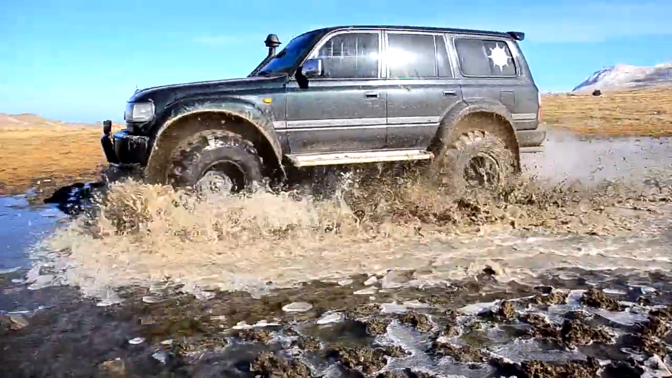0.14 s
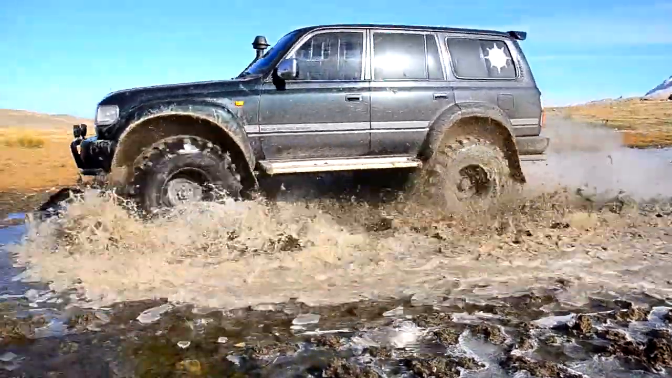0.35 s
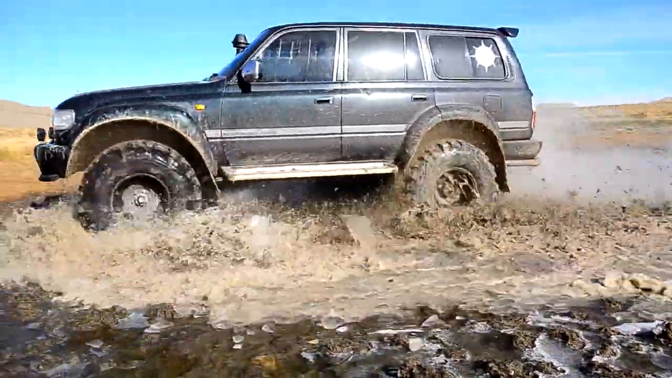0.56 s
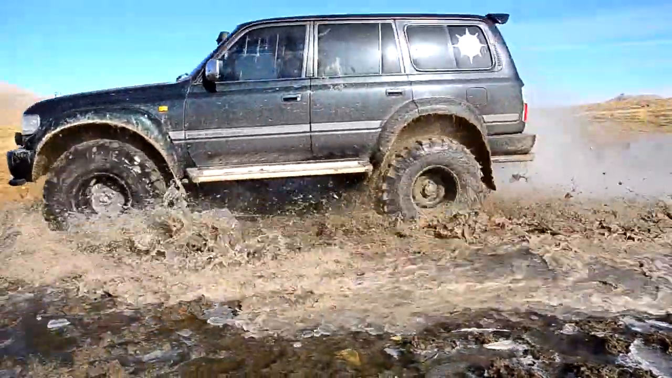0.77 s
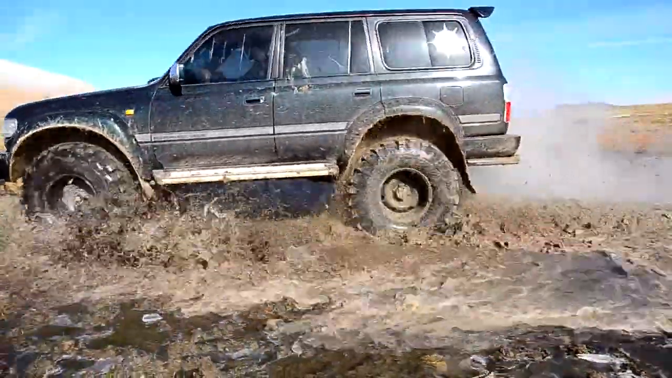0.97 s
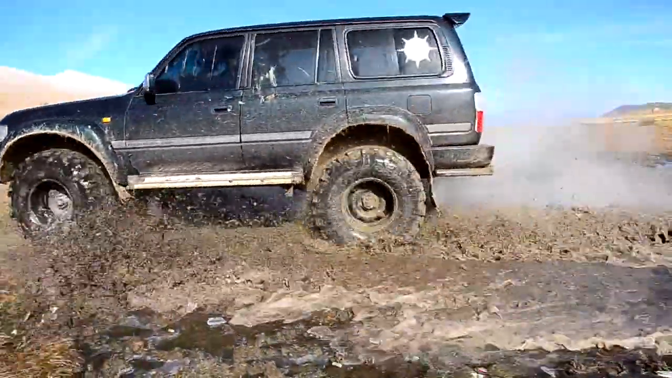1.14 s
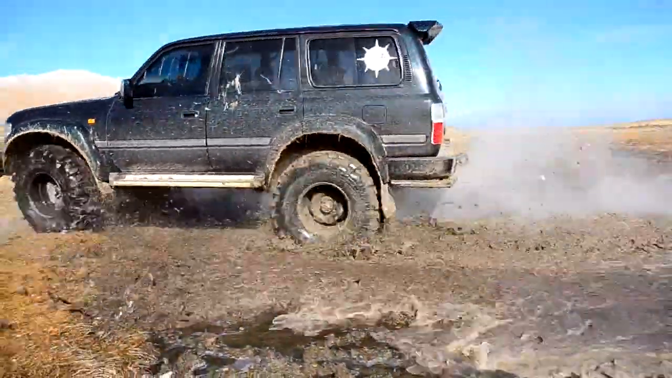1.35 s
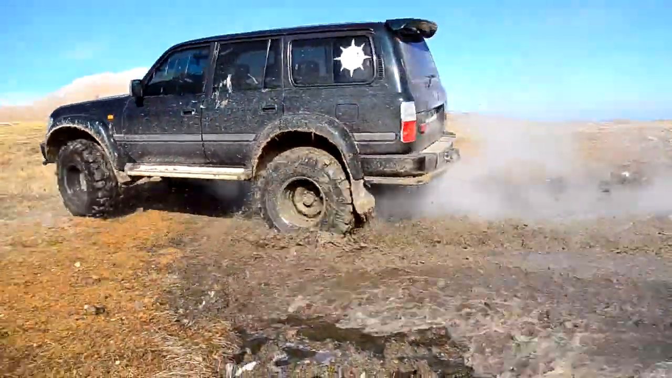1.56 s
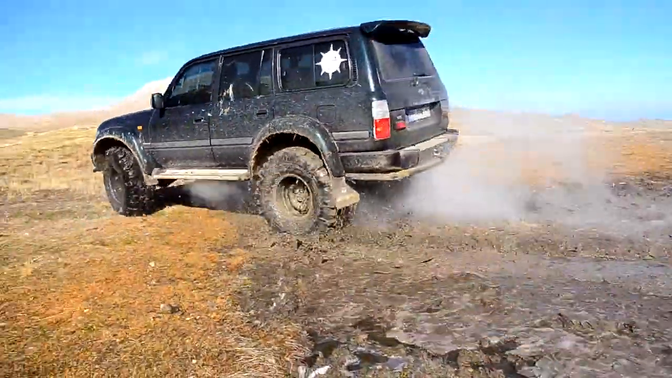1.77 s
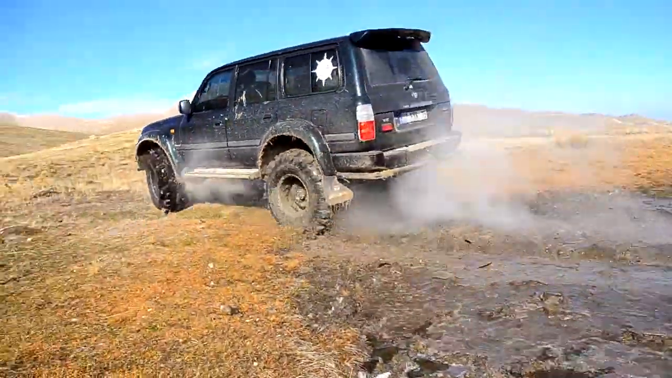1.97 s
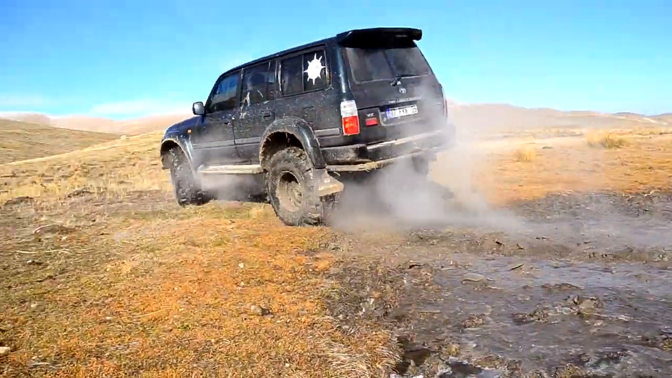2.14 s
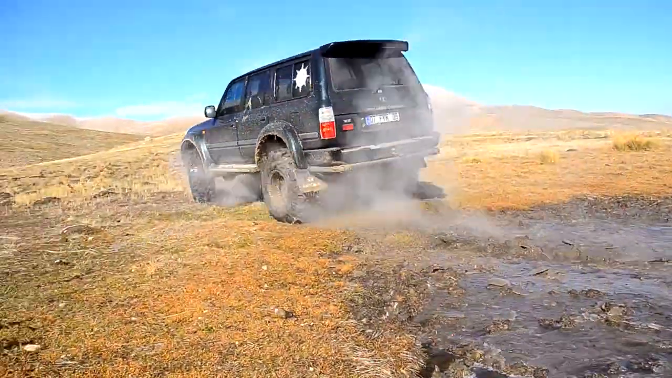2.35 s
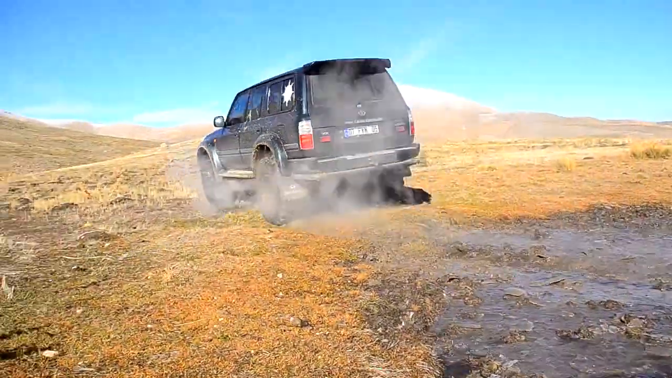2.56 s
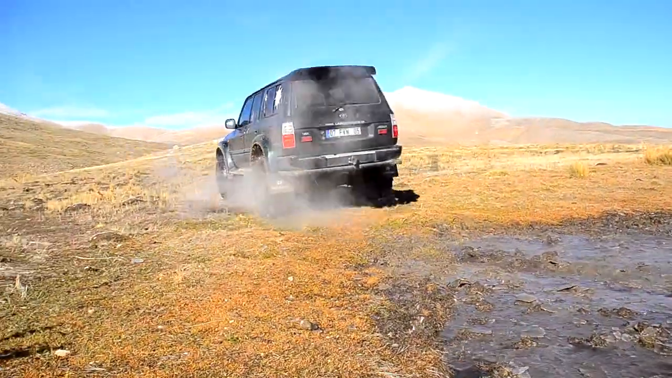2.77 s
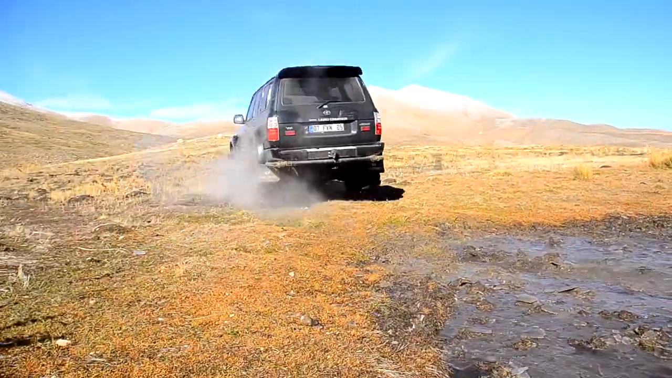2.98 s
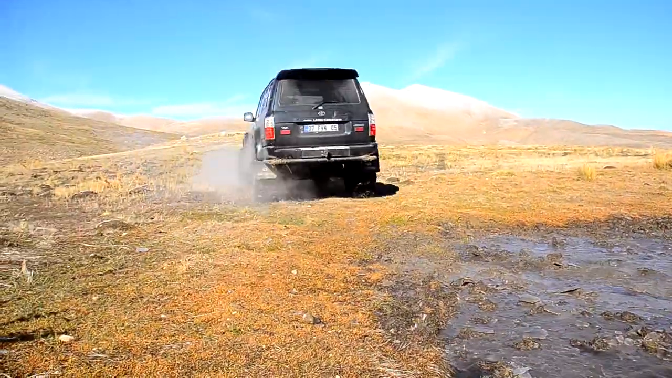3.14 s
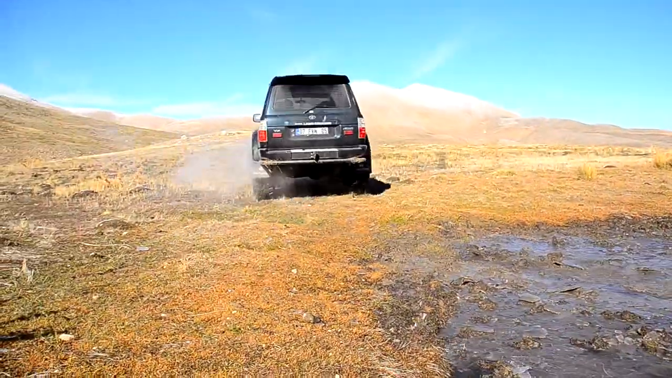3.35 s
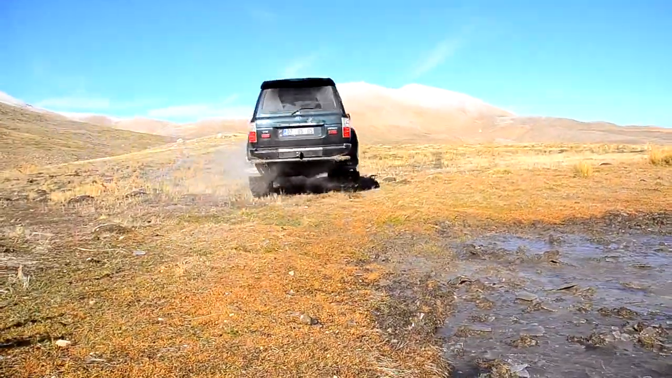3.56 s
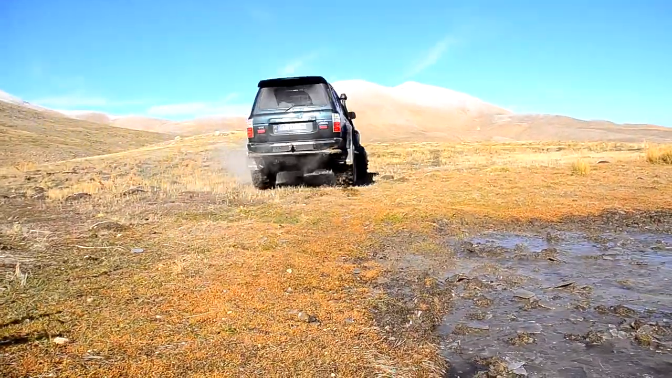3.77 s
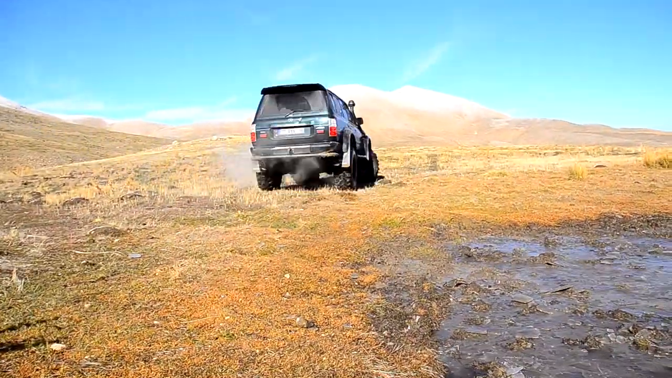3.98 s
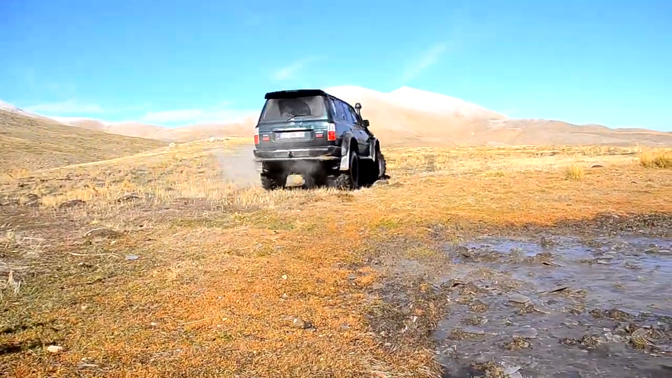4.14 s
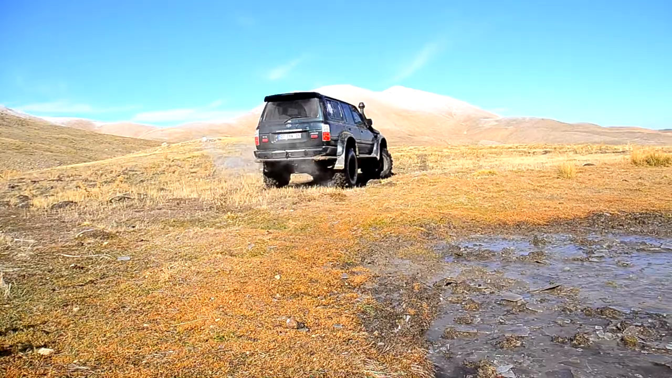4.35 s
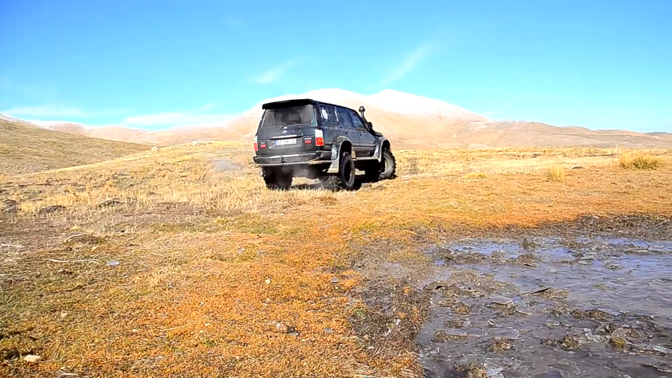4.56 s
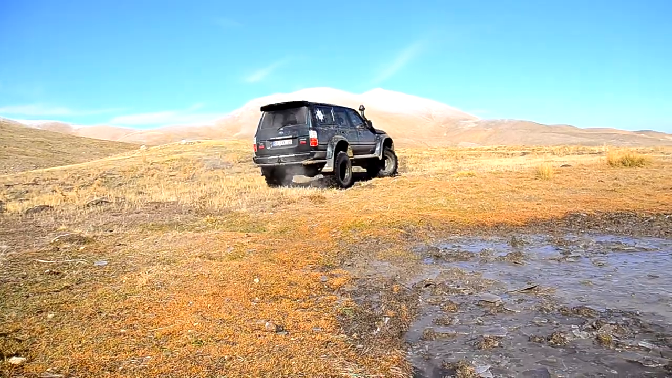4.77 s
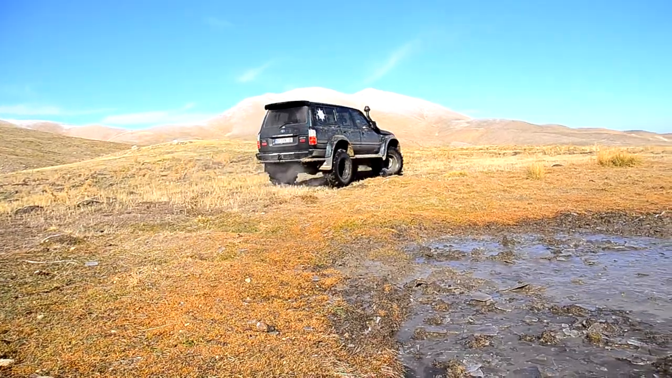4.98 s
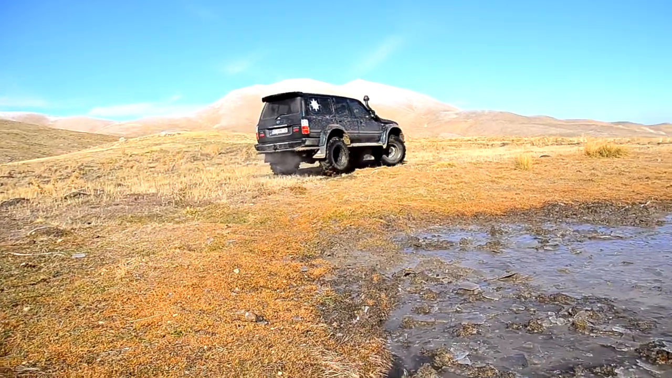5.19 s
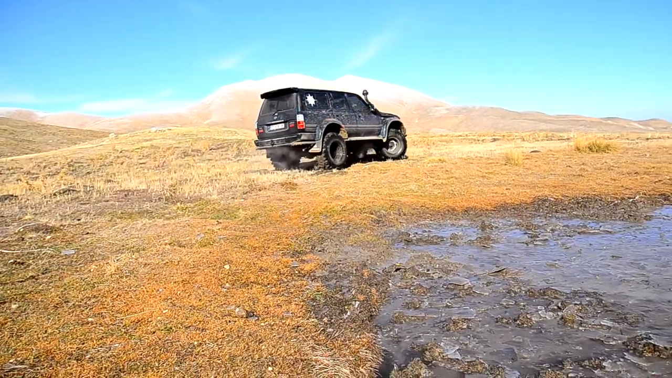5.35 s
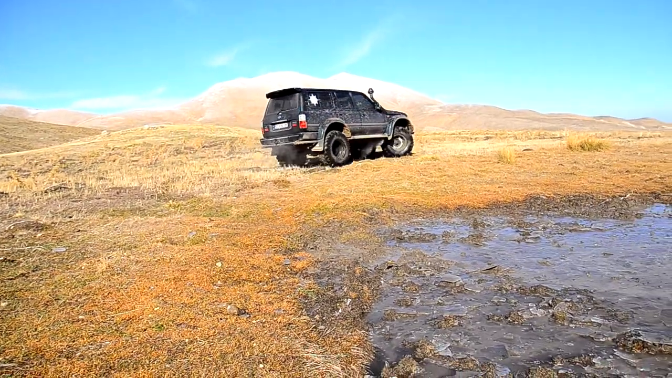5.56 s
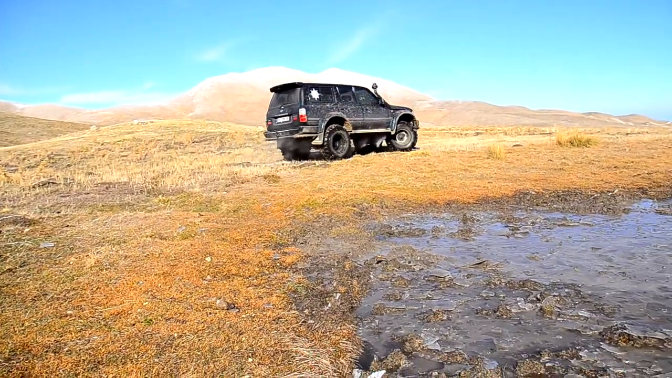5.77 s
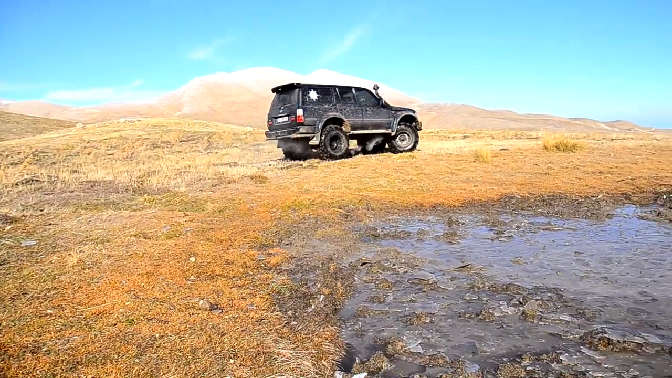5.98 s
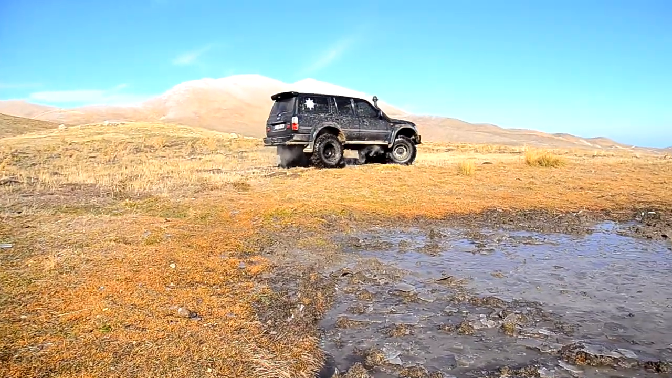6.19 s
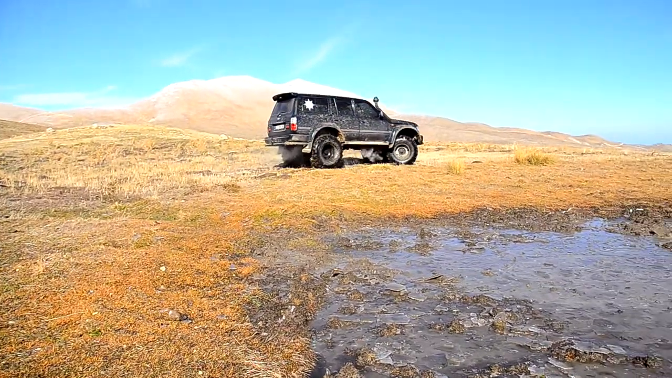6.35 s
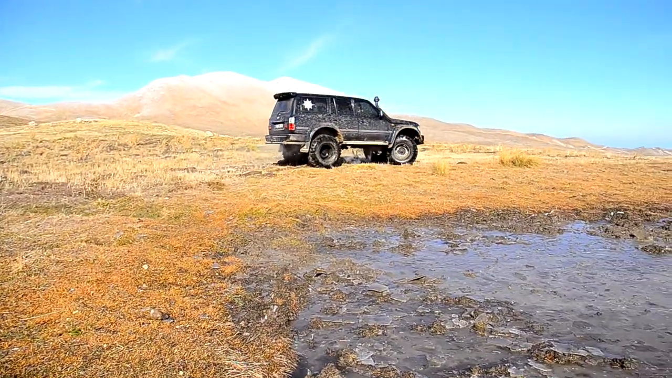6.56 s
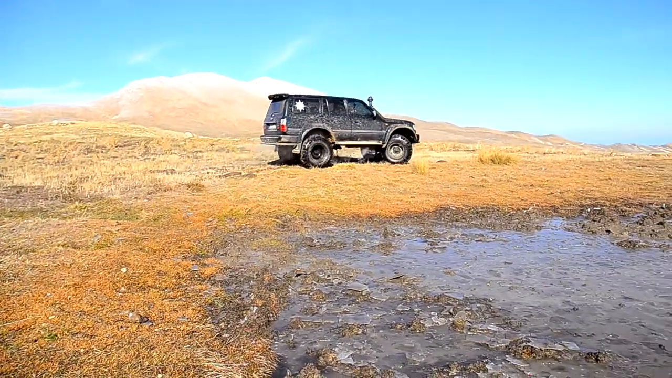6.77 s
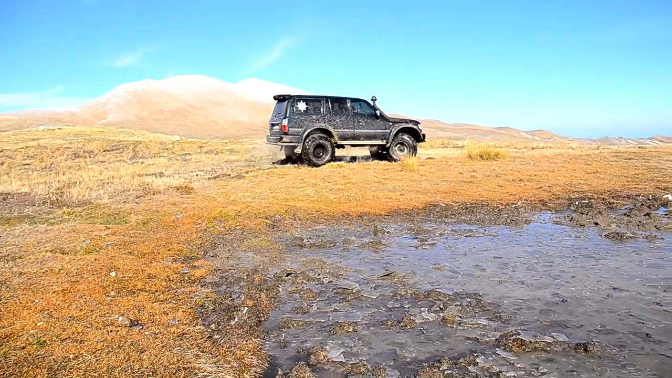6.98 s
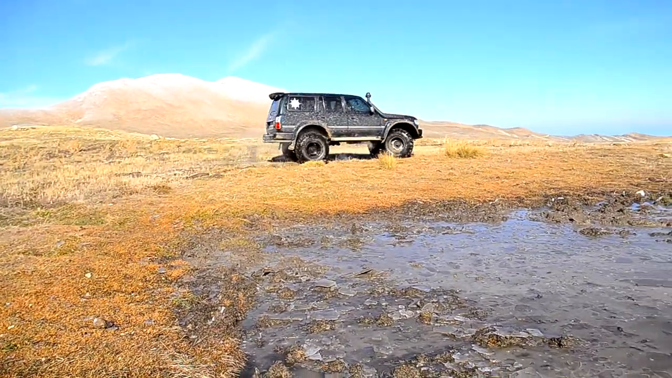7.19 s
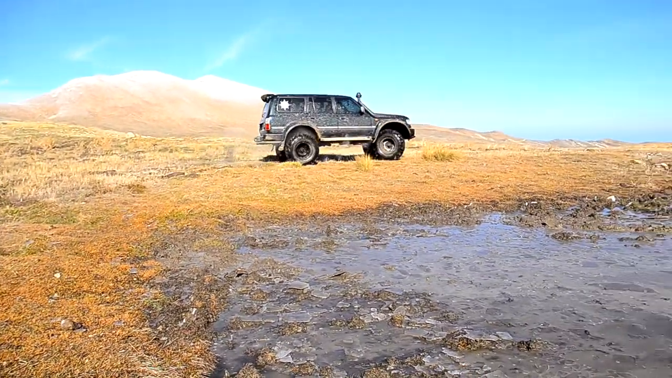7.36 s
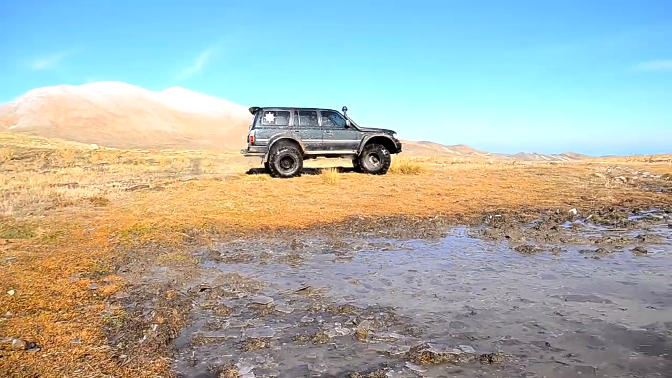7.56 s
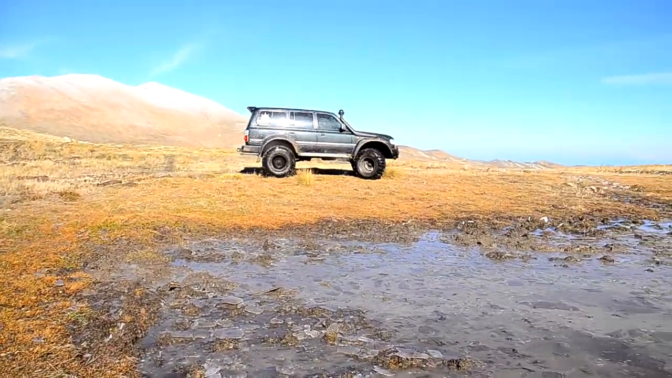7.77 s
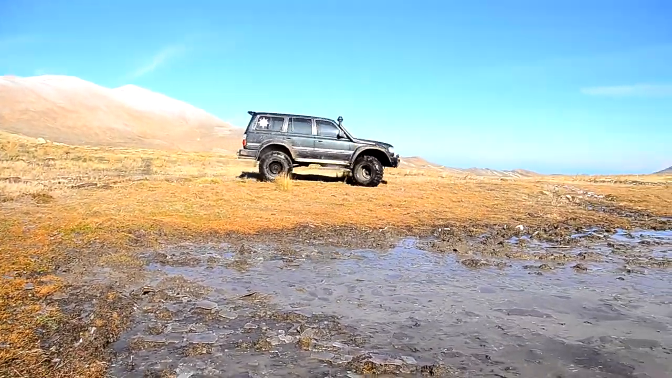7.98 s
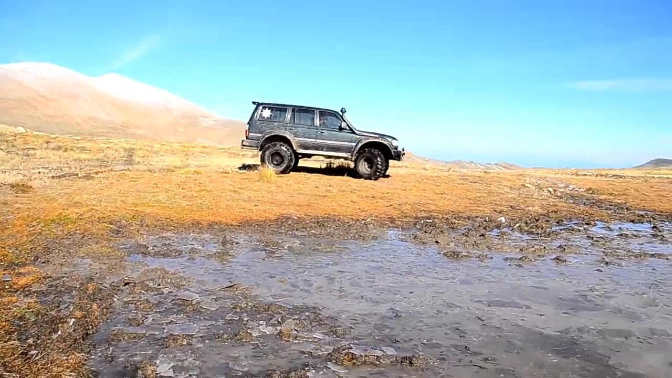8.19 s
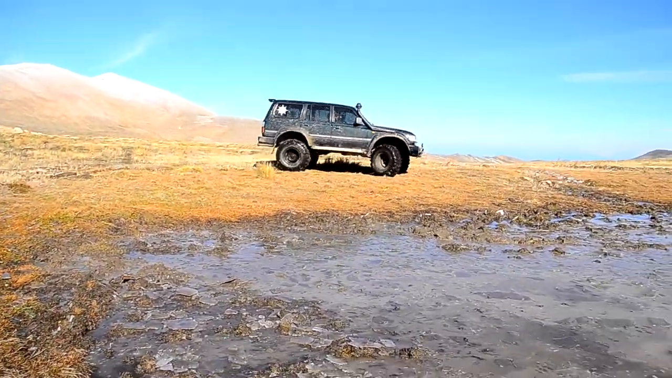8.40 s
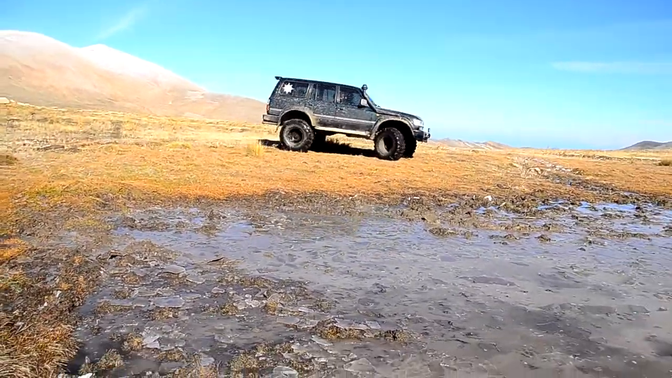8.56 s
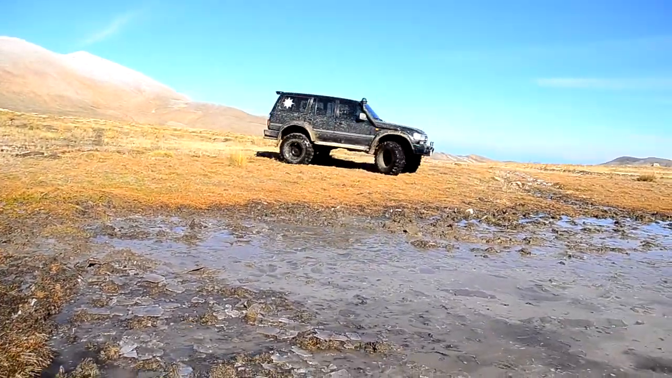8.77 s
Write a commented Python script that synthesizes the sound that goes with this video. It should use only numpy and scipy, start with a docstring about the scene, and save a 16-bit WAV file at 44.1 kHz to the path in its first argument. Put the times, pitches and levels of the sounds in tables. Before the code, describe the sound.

An off-road truck's six-cylinder engine roars at high revs right beside the microphone, overloading it, while the wheels churn a muddy pool with loud sloshing and pattering spray over a low rumble. A short, sharp squeal cuts through at about 0.7 seconds. The revs fall, with a small push near 1.5 seconds, and the splashing dies out by 2.5 seconds. The engine revs twice, at about 2.2 and 3.2 seconds, the exhaust booming and barking, with a few dry ticks and a crack between 2.5 and 3.1 seconds. From 3.7 seconds the truck burbles away outdoors at low revs, quieter and throbbing, with faint fan whirr, wet tyres squelching on grass and occasional ticks. From 6.6 seconds it pulls again, with faint squeaks and a sharp tick around 7.5 to 8 seconds, swelling once more as it nears 8.8 seconds.

```python
"""Off-road truck in the mud

A six-cylinder truck ploughs through a muddy pool right beside the microphone, overloading it.
It revs twice to climb the bank, then burbles away over grass and pulls again. The exhaust booms
whenever one of the engine's tones meets a pitch at which the pipe rings, and throbs once per shaft turn."""
import sys
import numpy as np
from scipy import signal
from scipy.fft import rfft, irfft, next_fast_len
from scipy.io import wavfile
from scipy.ndimage import map_coordinates

SR = 44100
rng = np.random.default_rng(int(sys.argv[2]) if len(sys.argv) > 2 else 0)


def persist_wave(psi):
    """Save psi, clipped to +-1, as 16-bit WAV."""
    counts = np.round(np.clip(psi, -1, 1) * 32767).astype(np.int16)
    wavfile.write(sys.argv[1], SR, np.atleast_2d(counts).T)


N = 389403
TIME_S = np.arange(N) / SR


def amp(db):
    """Turn decibels into a gain."""
    return 10 ** (np.asarray(db) / 20)


def unit(x):
    """Scale a sound to an average power of 1."""
    return x / np.sqrt(np.mean(x ** 2) + 1e-20)


def curve(rows):
    """Join (time, value) points with straight lines, one value per sample."""
    return np.interp(TIME_S, *np.transpose(rows))


def wobble(rate):
    """A smooth random curve through `rate` points a second."""
    return map_coordinates(rng.standard_normal(int(N * rate / SR) + 4), [np.arange(N) * rate / SR])


def filtered(x, response):
    """Change each frequency in x by the gain and phase that response(hz) gives."""
    size = next_fast_len(N + SR // 2)
    return irfft(rfft(x, size) * response(np.fft.rfftfreq(size, 1 / SR)), size)[:N]


def coloured(x, spectrum):
    """Shape x with a tone colour table, cut everything outside it, and scale to power 1."""
    pitch_hz, level_db = np.transpose(spectrum)
    gain = lambda hz: amp(np.interp(np.log(hz + 1), np.log(pitch_hz), level_db, left=-120, right=-120))
    return unit(filtered(x, gain))


def resonance(hz, centre, width):
    """How something that rings at one pitch responds to each frequency."""
    return 1j * hz * width / (centre ** 2 - hz ** 2 + 1j * hz * width)


def ringing(x, modes):
    """Pass x twice through each resonance, add them up, and scale to power 1."""
    response = lambda hz: sum(amp(db) * resonance(hz, centre, width) ** 2 for centre, width, db in modes)
    return unit(filtered(x, response))


def pulses(firings, pattern, scatter):
    """One pulse per firing, sized by cylinder and by chance, at steady power."""
    at = np.flatnonzero(np.diff(np.floor(firings)) > 0)
    sizes = np.resize(pattern, len(at)) + scatter * rng.standard_normal(len(at))
    train = np.zeros(N)
    train[at] = sizes * np.sqrt(np.gradient(at))
    return train


def puffs(firings, depth_db):
    """Noise that swells at every firing."""
    return rng.standard_normal(N) * amp(depth_db * np.cos(2 * np.pi * firings))


def drops(per_s, spread_db, share):
    """Noise mixed with a share of single hits of very unequal size."""
    hits = (rng.random(N) < per_s / SR) * rng.choice([-1, 1], N)
    sizes = amp(spread_db * np.minimum(rng.exponential(size=N), 4))
    return rng.standard_normal(N) + share * unit(hits * sizes)


def effort(drive, cruise_db, throttle_db, octave_db, cruise_hz=50):
    """Gain of an engine sound: its cruising level, changed by the pedal and by each doubling of speed."""
    firing_hz, pedal = drive
    return amp(cruise_db + throttle_db * pedal + octave_db * np.log2(firing_hz / cruise_hz))


# How loud the rumble is: time_s, level_db
RUMBLE_LEVELS = [(0, -37), (1.3, -36), (2.2, -41), (2.6, -41.5), (4.6, -48), (5.2, -57), (6.4, -60),
                 (6.9, -48), (8.2, -62), (8.83, -69)]
# Tone colour of the rumble: pitch_hz, level_db
RUMBLE_COLOUR = [(10, -1.5), (25, -6), (45, 4), (70, -10), (110, -12), (250, -26.5)]

def rumble():
    """A restless low rumble beneath the engine."""
    return amp(curve(RUMBLE_LEVELS) + 2.5 * wobble(44)) * coloured(rng.standard_normal(N), RUMBLE_COLOUR)


# Pitches at which the engine bay rings around the fan: pitch_hz, width_hz, level_db
FAN_RESONANCES = [(1240, 78, -8), (1548, 220, -5.5), (3310, 150, -11), (4154, 290, -7.5)]

def fan(level_db=-45):
    """Air from the cooling fan whirrs in the engine bay, flickering a little."""
    gain = amp(level_db + 1.2 * wobble(3) + 0.92 * wobble(37))
    return gain * ringing(rng.standard_normal(N), FAN_RESONANCES)


# Dry ticks and knocks, and one lower crack as the engine revs: start_s, level_db, pitch_hz, width_octaves
KNOCKS = [(2.538, -36, 4560, 1.6), (2.744, -30, 3203, 0.66), (2.87, -29, 3050, .27),
          (2.973, -35, 6180, 0.68), (3.064, -26, 1300, 1.3), (4.456, -41, 7100, 0.24),
          (4.615, -37, 3990, 0.34), (4.875, -33, 3653, 0.59), (5.27, -37, 3285, .8),
          (6.248, -33.5, 6550, 0.89), (6.346, -55, 10000, .3), (7.44, -48, 12410, .2),
          (7.718, -25, 3070, 0.87)]

def knocks(fade_s=0.064):
    """Short, dry bursts of noise, each ringing around its own pitch and dying away fast."""
    out, t = np.zeros(N + SR), np.arange(SR // 8) / SR
    for start_s, level_db, pitch_hz, width_octaves in KNOCKS:
        edges_hz = np.minimum(pitch_hz * 2 ** (np.array([-.5, .5]) * width_octaves), SR / 2 - 1)
        band = signal.butter(4, edges_hz, "band", fs=SR, output="sos")
        ring = unit(signal.sosfilt(band, rng.standard_normal(len(t))))
        out[round(start_s * SR):][:len(t)] += amp(level_db - 60 * t / fade_s) * ring
    return out[:N]


# Short squeals: middle_s, length_s, pitch_hz, level_db
SQUEAL_NOTES = [(0.659, 0.22, 1474, -1.5), (7.445, 0.14, 1364, -38), (7.691, 0.067, 1295, -31),
                (7.928, 0.33, 3260, -54)]

def squeals():
    """Squeals, perhaps of a wet belt and of springs, swell and fade on a wavering pitch."""
    wavering_s = np.cumsum(1 + 0.0097 * wobble(120)) / SR
    out = np.zeros(N)
    for middle_s, length_s, pitch_hz, level_db in SQUEAL_NOTES:
        swell = np.cos(np.pi * np.clip((TIME_S - middle_s) / length_s, -.5, .5))
        out += amp(level_db) * swell * np.sin(2 * np.pi * pitch_hz * wavering_s)
    return np.sqrt(2) * out


# Tone colours of sloshing mud and of fine spray, for tyres and splash: pitch_hz, level_db
SLOSH_COLOUR = [(260, -34.5), (450, -20), (586, -3), (708, -1.5), (771, -0.5), (1350, 0.5), (1970, -9.5),
                (3560, -7), (5260, -20.5), (5600, -30.5), (7280, -48), (12300, -120)]
SPRAY_COLOUR = [(2940, -16.5), (5000, -0.5), (5760, -7), (7400, -2), (8940, -3), (10300, -11), (14000, -21),
                (15500, -25.5)]

def tyres(mud_db=-45, grit_db=-62):
    """Wet treads squelch over the grass and shed grit."""
    mud = amp(mud_db + 1.6 * wobble(12))
    mud *= coloured(drops(per_s=700, spread_db=4.5, share=0.97), SLOSH_COLOUR)
    grit = amp(grit_db + 1.2 * wobble(3.2))
    grit *= coloured(drops(per_s=300, spread_db=2, share=.7), SPRAY_COLOUR)
    return mud + grit


# How hard the wheels churn the pool: time_s, level_db
CHURN_LEVELS = [(0, -6), (.5, -5.5), (.64, -2.5), (.82, -6.8), (1.1, -7.5), (1.7, -15.5), (2.15, -26.5),
                (2.5, -61.5)]

def splash(spray_db=-11):
    """Tyres churn the muddy water and spray patters down until the truck is on the bank."""
    slosh = amp(0.9 * wobble(29.6) + 1.3 * wobble(8.38))
    slosh *= coloured(drops(per_s=900, spread_db=4, share=0.57), SLOSH_COLOUR)
    spray = amp(spray_db + 0.56 * wobble(40.6))
    spray *= coloured(drops(per_s=1000, spread_db=3, share=0.49), SPRAY_COLOUR)
    return amp(curve(CHURN_LEVELS)) * (slosh + spray)


# The engine bay is quieter while the truck faces away and its body is in between: time_s, gain_db
BAY_GAINS = [(0, -27), (2, -31.5), (3.4, -37.5), (3.8, -40.5), (4.9, -42.5), (5.5, -39), (6.3, -36.5),
             (8.4, -38), (8.83, -32)]
# Tone colours of the clatter and the hiss: pitch_hz, level_db
CLATTER_COLOUR = [(600, -24), (900, -19), (1180, 4), (1500, 4.5), (1750, 0), (2150, -4.5), (2550, -2.5),
                  (3150, -1.5), (3750, -5), (4400, -5.5), (5300, -14), (7000, -39.5)]
HISS_COLOUR = [(2940, -35.5), (5000, -2.5), (5630, 3.5), (6070, 1.5), (6800, -1.5), (7870, 1), (8690, -5),
               (9600, -5.5), (10400, -16), (11500, -18), (15500, -41)]

def engine_bay(firings, drive):
    """Burning fuel clatters and incoming air hisses, beating with the firings and growing with effort."""
    clatter = amp(0.65 * wobble(22))
    clatter *= coloured(puffs(firings, depth_db=0.3) * amp(0.67 * wobble(300)), CLATTER_COLOUR)
    clatter *= effort(drive, cruise_db=1.35, throttle_db=3, octave_db=8.5)
    hiss = amp(.6 * wobble(12))
    hiss *= coloured(puffs(firings, depth_db=1) * amp(1.6 * wobble(400)), HISS_COLOUR)
    hiss *= effort(drive, cruise_db=-11.5, throttle_db=11, octave_db=3.5)
    return amp(curve(BAY_GAINS)) * (clatter + hiss)


# Tone colours of the exhaust's bark and rasp: pitch_hz, level_db
BARK_COLOUR = [(430, -53), (545, -18), (615, 16.5), (700, -4), (795, 7), (880, -25.5), (1020, -4),
               (1400, -10.5), (3000, -36.5)]
RASP_COLOUR = [(40, -16), (100, 3), (200, 5), (330, 7), (450, 5), (620, -1), (900, -7.5), (1300, -16.5),
               (3000, -38)]

def exhaust_gas(firings, drive):
    """The gas pulses bark when the pedal is down, and the flow rasps as the engine works harder."""
    _, pedal = drive
    bark = pedal ** 1.29 * coloured(pulses(firings, [1], scatter=.1), BARK_COLOUR)
    bark *= effort(drive, cruise_db=-20, throttle_db=0, octave_db=8)
    rasp = coloured(puffs(firings, depth_db=1), RASP_COLOUR)
    rasp *= effort(drive, cruise_db=-28.5, throttle_db=8, octave_db=7.5)
    return bark + rasp


# How much stronger or weaker each of the six cylinders fires, in turn: strength_offset
CYLINDER_OFFSETS = [1, 0, -.25, .97, -.05, -.28]
# Pitches at which the exhaust pipe rings: pitch_hz, width_hz, level_db
PIPE_RESONANCES = [(208.6, 24.1, 10.5), (319, 54, -2), (409.5, 61, -17.5), (580, 37, -31)]

def exhaust_throb(firings, drive):
    """Unequal cylinders ring the pipe once per shaft turn; two silencer chambers round each pulse."""
    uneven = pulses(firings, CYLINDER_OFFSETS, scatter=.07)
    return effort(drive, cruise_db=-22, throttle_db=-4, octave_db=-1) * ringing(uneven, PIPE_RESONANCES)


# Tones at 1 to 8 times the firing rate, before the pipe shapes them: cruise_db, throttle_db, octave_db
ENGINE_TONES = [(-27.5, 25, 5), (-1, 1, 5), (-23, 19.5, 11.5), (-6, 0, -2), (-20.5, 25, -2.5),
                (-21, 32, 5.5), (-31, 25, -5), (-20, 38, -2)]
# How much of each pitch the exhaust lets through: pitch_hz, gain_db
PIPE_GAINS = [(45, -25.5), (70, -18.5), (98, -36.5), (125, -13.5), (145, -11.5), (172, -12), (190, -9.5),
              (208, 0), (238, -7), (258, -18.5), (325, -10.5), (390, -18.5), (428, -11.5), (520, -47),
              (1000, -52.5)]
# The exhaust's low note sinks under the loud opening roar, then drops briefly between revs:
# middle_s, length_s, depth (0 to 1)
NOTE_DIPS = [(0.468, 0.16, 0.8), (0.765, 1, 0.92), (1.936, 0.19, .82), (2.36, 0.13, 0.7),
             (2.554, 0.19, 0.77), (2.784, 0.058, 0.42), (2.877, 0.21, 0.72), (3.526, 0.022, 0.31)]

def exhaust_note(firings, drive, hot_shift=0.081):
    """Engine tones boom as they cross the pipe's resonances; the pedal fills in the odd and high ones."""
    firing_hz, pedal = drive
    phase = 2 * np.pi * (firings + .005 * wobble(25))
    pipe_hz, pipe_db = np.transpose(PIPE_GAINS)
    log_rate = np.log(firing_hz / (1 + hot_shift * pedal))  # hot gas moves the booms up in pitch
    note = np.zeros(N)
    for multiple, levels in enumerate(ENGINE_TONES, 1):
        passed_db = np.interp(log_rate + np.log(multiple), np.log(pipe_hz), pipe_db)
        flutter_db = (.7 if multiple <= 4 else 1.8) * wobble(16)
        note += effort(drive, *levels) * amp(passed_db + flutter_db) * np.cos(multiple * phase)
    # The pipe's lowest resonance delays the tones near it.
    centre, width, _ = PIPE_RESONANCES[0]
    note = np.sqrt(2) * filtered(note, lambda hz: np.exp(2j * np.angle(resonance(hz, centre, width))))
    for middle_s, length_s, depth in NOTE_DIPS:
        note *= 1 - depth * np.exp(-(2 * (TIME_S - middle_s) / length_s) ** 2)
    return note


# How well the tailpipe is heard as the truck passes, turns and draws away: time_s, gain_db
TAILPIPE_GAINS = [(0, 4.5), (.7, 8.5), (1.25, 7.5), (1.8, 4.5), (2.2, 7), (2.45, 3.5), (3, 4), (3.6, -1),
                  (4.7, -3.5), (5.15, -4.5), (6.4, -3), (7, -4), (7.6, -5), (8, -5), (8.5, -5), (8.83, 0.5)]

def exhaust(firings, drive, throb_share=0.35):
    """Note, gas and throb leave the tailpipe; the throb follows only a share of its swings in level."""
    gain_db = curve(TAILPIPE_GAINS)
    note_and_gas = exhaust_note(firings, drive) + exhaust_gas(firings, drive)
    return amp(gain_db) * note_and_gas + amp(throb_share * gain_db) * exhaust_throb(firings, drive)


# Presses of the accelerator pedal: down_s, up_s, depth (0 to 1)
PEDAL_PRESSES = [(-.06, 0.236, 0.63), (0.442, 0.747, 1), (1.458, 1.714, 0.39), (2.003, 2.25, 0.57),
                 (2.993, 3.412, 0.25), (6.609, 7.651, 0.41), (7.693, 8.59, 0.37), (8.626, 8.9, 0.54)]

def throttle(press_s=0.098, release_s=0.13):
    """How far down the pedal is: every press rises, holds and is let go."""
    pedal = np.zeros(N)
    for down_s, up_s, depth in PEDAL_PRESSES:
        travel = np.minimum((TIME_S - down_s) / press_s, 1 - (TIME_S - up_s) / release_s)
        pedal += depth * np.clip(travel, 0, 1)
    return pedal


# Engine speed, as cylinder firings a second: time_s, firing_hz
ENGINE_SPEED = [(0.0, 129), (0.27, 130.3), (0.49, 113.4), (0.72, 112.5), (1.09, 85.34), (1.4, 72.35),
                (1.81, 59.74), (1.94, 59.67), (2.21, 70.4), (2.3, 70.6), (2.71, 47.13), (2.95, 45.35),
                (3.13, 57.5), (3.32, 63.96), (3.45, 61), (3.67, 50), (3.96, 49.4), (4.2, 52.1), (4.8, 51.2),
                (5.03, 46.13), (5.51, 46.43), (5.81, 42.34), (6.15, 45.18), (6.47, 43.36), (6.76, 51.1),
                (6.94, 53.37), (7.26, 60.66), (7.64, 63.48), (7.93, 58.6), (8.5, 61.65), (8.83, 65.75)]

def scene():
    """Engine speed and pedal drive the exhaust and engine bay; the other sounds are added on top."""
    firing_hz = curve(ENGINE_SPEED)
    drive = firing_hz, throttle()
    firings = np.cumsum(firing_hz) / SR  # running count of firings
    engine = exhaust(firings, drive) + engine_bay(firings, drive)
    return (engine + fan() + rumble() + squeals() + splash() + tyres() + knocks())[None]


# Pitches weakened by the microphone's small opening: pitch_hz, width_hz, depth (0 to 1)
MICROPHONE_DIPS = [(5670, 480, 1), (6870, 130, 0.78)]

def record(dry):
    """The microphone notches the treble, flattens loud peaks and cuts off the very highest pitches."""
    ceiling, hardness, top_hz = .78, 12, 15700
    dips = lambda hz: [1 - depth * resonance(hz, pitch, width) for pitch, width, depth in MICROPHONE_DIPS]
    notched = filtered(dry[0], lambda hz: np.prod(dips(hz), axis=0))
    clipped = notched / (1 + np.abs(notched / ceiling) ** hardness) ** (1 / hardness)
    return filtered(clipped, lambda hz: hz < top_hz)[None]


dry = scene()
out = record(dry)
persist_wave(out)
```